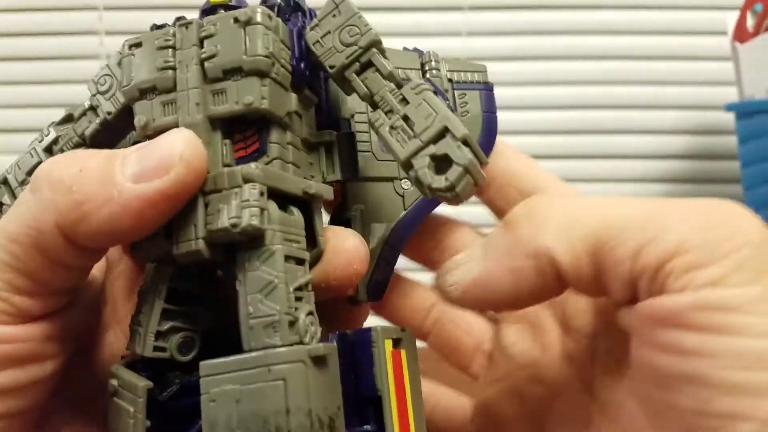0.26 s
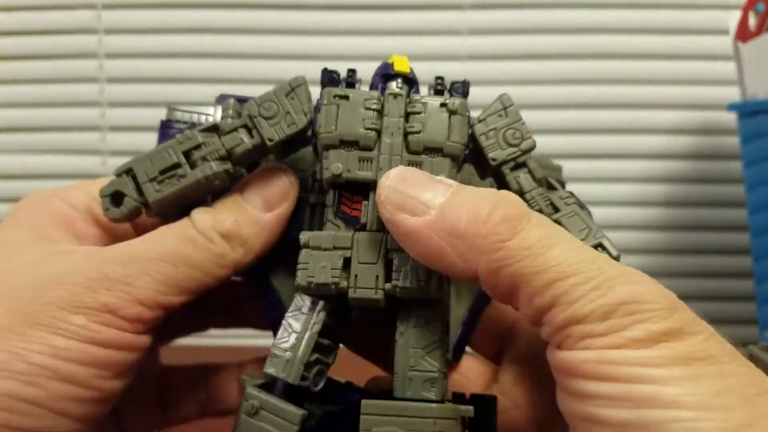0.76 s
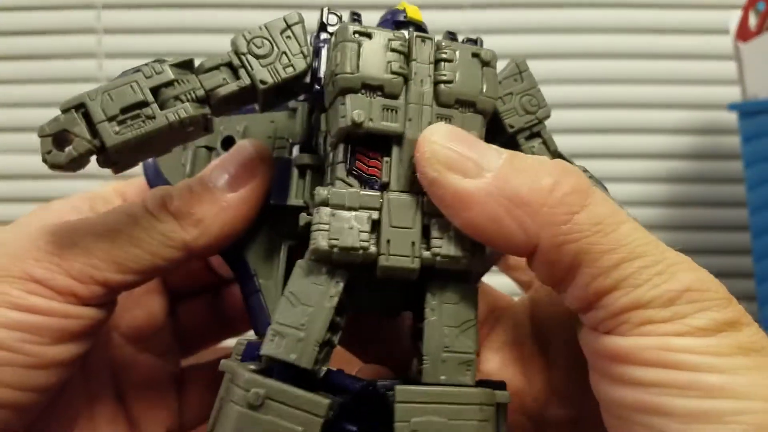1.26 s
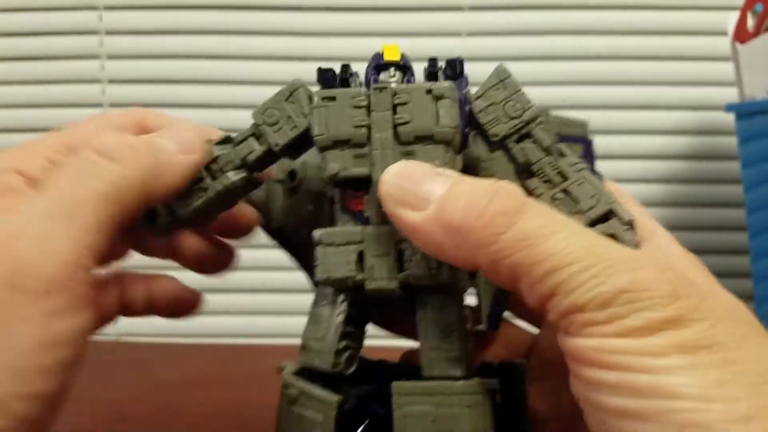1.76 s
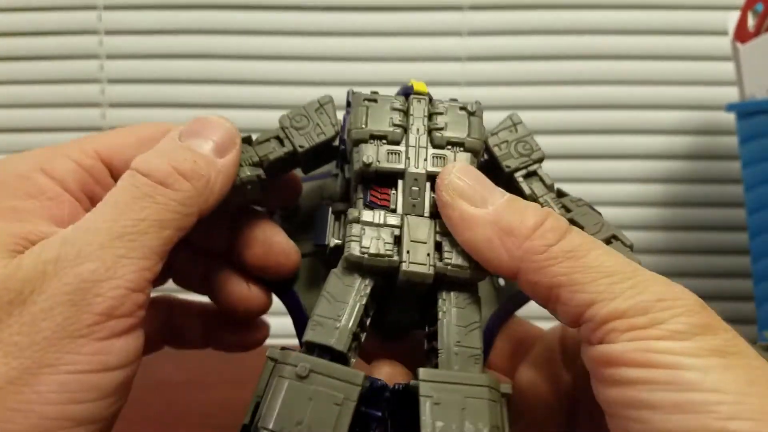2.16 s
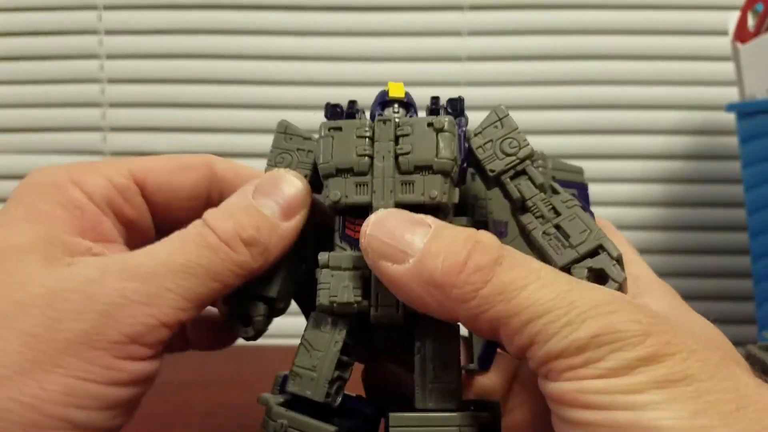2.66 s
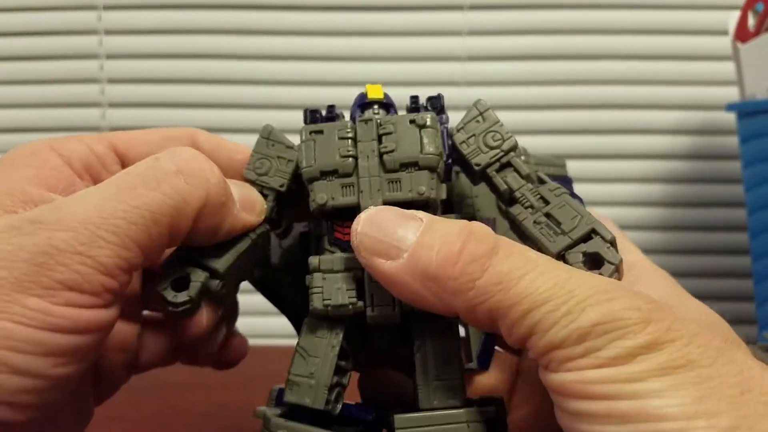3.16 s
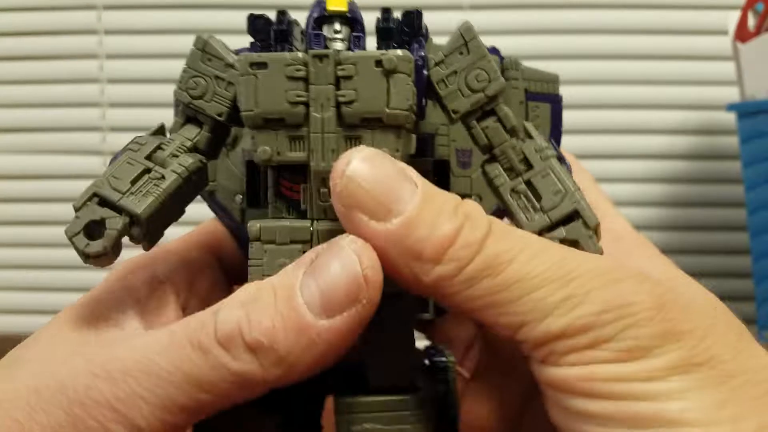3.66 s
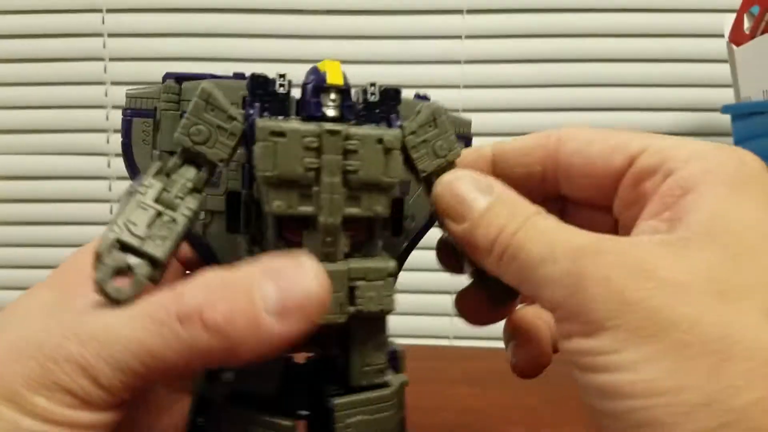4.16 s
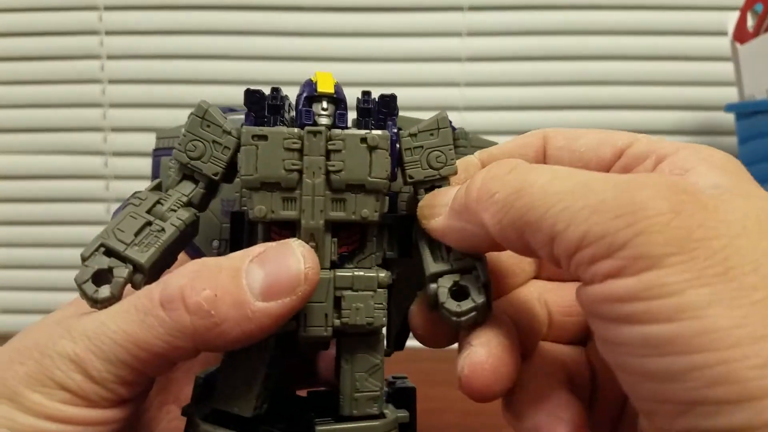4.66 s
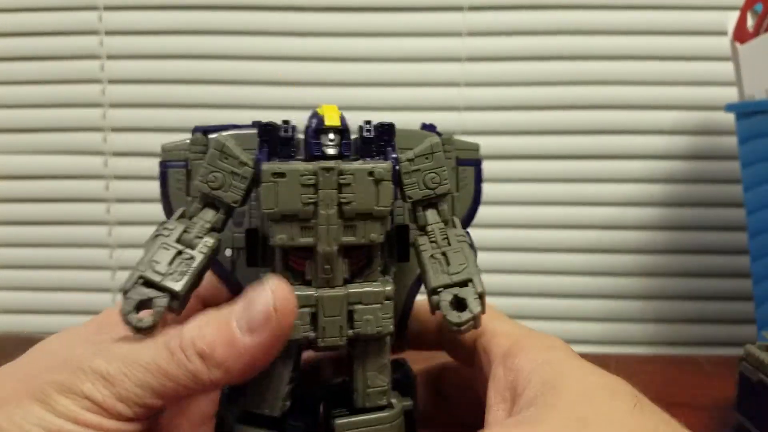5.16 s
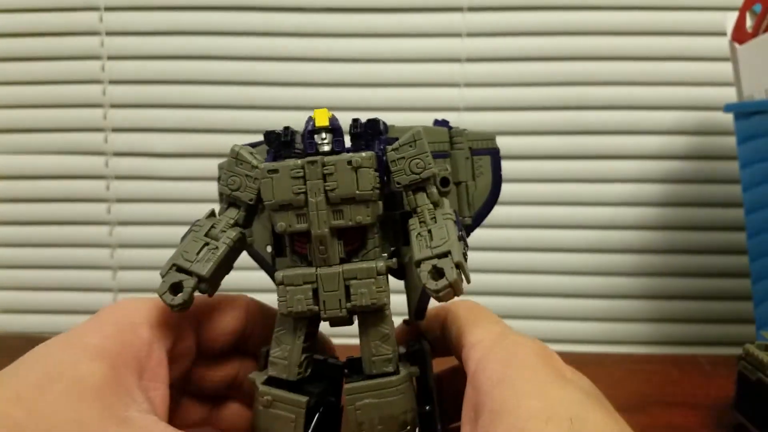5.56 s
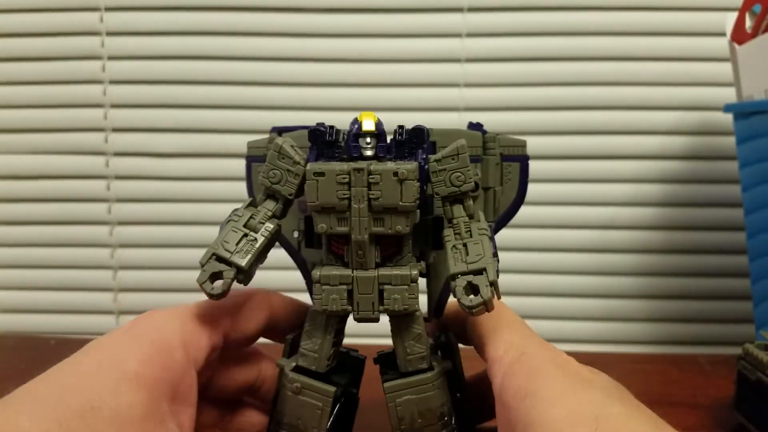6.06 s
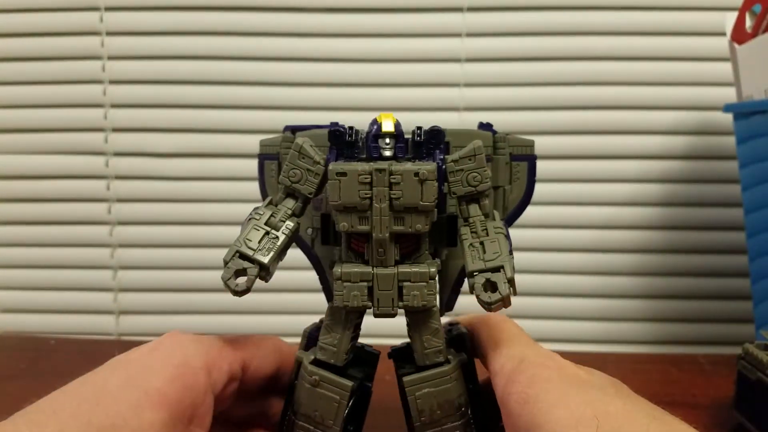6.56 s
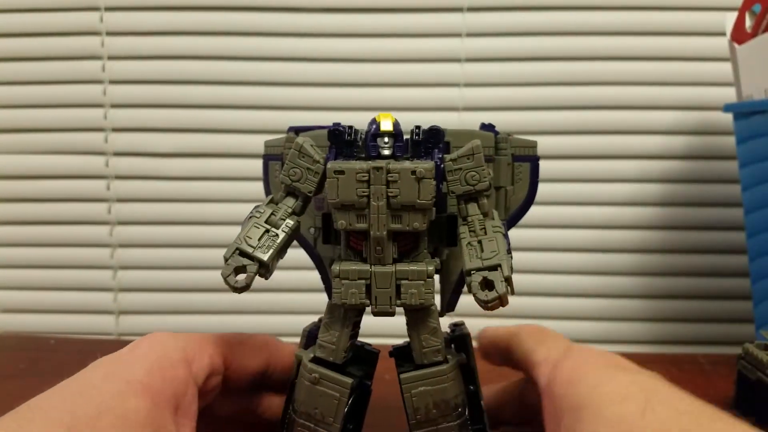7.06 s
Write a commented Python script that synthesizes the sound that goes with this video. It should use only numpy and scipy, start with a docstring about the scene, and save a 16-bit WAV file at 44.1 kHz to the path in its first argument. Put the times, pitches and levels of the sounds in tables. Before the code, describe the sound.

Light clicks and scrapes of a plastic figure being handled, followed by a louder knock and soft thumps on a desk.

```python
"""Plastic toy figure on a desk

Hands turn a hollow plastic figure, then stand it on a wooden desk in a quiet, humming room.
Impacts of joints and loose parts, and the friction of fingers, excite the resonances of its shell.
Its feet knock and drag on the desk top, which booms. Two microphone ports hear it from close by."""
import sys
import numpy as np
from scipy import signal
from scipy.fft import rfft, irfft
from scipy.io import wavfile
from scipy.ndimage import uniform_filter1d, map_coordinates

SR = 44100
rng = np.random.default_rng(int(sys.argv[2]) if len(sys.argv) > 2 else 0)


def transcribe(signal):
    """Save signal, clipped to [-1, 1], as a 16-bit WAV file at the path in sys.argv[1]."""
    frames = np.atleast_2d(signal).T
    limited = np.clip(frames, -1, 1)
    pcm = np.round(limited * 32767).astype(np.int16)
    wavfile.write(sys.argv[1], SR, pcm)


N = 321930


def undb(db):
    """Amplitude ratio of a level in decibels."""
    return 10 ** (np.asarray(db) / 20)


def unit(x):
    """Normalisation to rms 1."""
    return x / np.sqrt(np.mean(x ** 2))


def decay(t, t60_s):
    """Exponential damping: 60 dB down after t60_s."""
    return np.exp(-np.log(1000) * t / t60_s)


def pan(left_over_right_db):
    """A level difference between the ports, as left and right gains."""
    return undb([[left_over_right_db / 2], [-left_over_right_db / 2]])


def curve(table):
    """Linear interpolation of each column over time, one value a sample."""
    time_s, *columns = np.transpose(table)
    return [np.interp(np.arange(N) / SR, time_s, column) for column in columns]


def ring(x, modes):
    """Modal superposition: resonators of alternating sign, scaled so white noise keeps its rms."""
    bank = [(signal.iirpeak(hz, hz / width_hz, SR), (-1) ** k * undb(db))
            for k, (hz, width_hz, db) in enumerate(modes)]
    impulse = signal.unit_impulse(4096)
    response = sum(gain * signal.lfilter(*mode, impulse) for mode, gain in bank)
    return sum(gain * signal.lfilter(*mode, x) for mode, gain in bank) / np.linalg.norm(response)


def band(x, low_hz, high_hz):
    """Band-pass filtering."""
    return signal.sosfilt(signal.butter(2, [low_hz, high_hz], "bandpass", fs=SR, output="sos"), x)


def wander(rate_hz):
    """Random modulation of rms 1: straight ramps between random values."""
    hold = int(SR / rate_hz)
    steps = np.repeat(rng.standard_normal(N // hold + 1), hold)
    return unit(uniform_filter1d(steps, hold)[:N])


def add(out, start_s, sound):
    """Superposition of a short sound on a longer one."""
    i = max(int(start_s * SR), 0)
    out[..., i:i + sound.shape[-1]] += sound[..., :N - i]


def strokes(table, extra_db=0):
    """Incoherent sum of envelopes that rise and fall straight in dB, length_s wide at depth_db down."""
    depth_db, rise_share, step = 15, 0.46, 32
    peak_s, level_db, length_s = np.transpose(table)[:3, :, None]
    late_s = np.arange(0, N, step) / SR - peak_s
    fall = np.maximum(-late_s / rise_share, late_s / (1 - rise_share)) / length_s
    power = np.sum(undb(level_db + extra_db - depth_db * fall) ** 2, axis=0)
    return np.repeat(np.sqrt(power), step)[:N]


# Spectrum of the background noise: frequency_hz, relative_density_db
HUM_SPECTRUM = [(30, -25), (50, -10), (130, -7.5), (215, -41), (262, 3.5), (330, -17.5), (520, 0.5),
                (620, -3), (720, -9), (1100, -3), (3140, -14), (3830, -18), (6330, -24), (8770, -30.5),
                (13400, -24), (16000, -19.5)]
# Likeness of that noise at the two ports: frequency_hz, correlation
HUM_CORRELATION = [(60, 0.97), (300, 1), (640, -0.38), (1400, -0.44), (3000, -0.036), (16000, -0.0039)]
# Blurred tones in the hum: pitch_hz, width_hz, level_db
HUM_TONES = [(275.3, 9.5, -83), (399.8, 13, -74.5), (582.6, 5.9, -73.5), (829, 9, -78), (1124, 11, -79.5)]
def hum():
    """Stationary room and microphone noise, correlated in the bass and independent in the treble."""
    log_hz = np.log(np.maximum(np.arange(N // 2 + 1) * SR / N, 1))
    density_db, correlation = [np.interp(log_hz, np.log(hz), values)
                               for hz, values in map(np.transpose, (HUM_SPECTRUM, HUM_CORRELATION))]
    spectra = rfft(rng.standard_normal((2, N))) * undb(density_db)
    mid, side = spectra * np.sqrt([1 + correlation, 1 - correlation])
    out = unit(irfft([mid + side, mid - side], N)) * undb(-60 + 0.66 * wander(5.07))
    for pitch_hz, width_hz, level_db in HUM_TONES:
        noise = rng.standard_normal(N) + 0.65 * rng.standard_normal((2, N))
        out += undb(level_db) * ring(noise, [(pitch_hz, width_hz, 0)])
    return out


def room(x, level_db=-9):
    """Diffuse reverberation: convolution with a short, dull noise tail, different at each port."""
    t = np.arange(SR // 2) / SR
    tail = rng.standard_normal((2, len(t))) * decay(t, t60_s=0.12) * (t > .003)
    tail = signal.lfilter([1], [1, -.3], tail)
    tail /= np.linalg.norm(tail, axis=1, keepdims=True)
    return undb(level_db) * signal.fftconvolve(x, tail, axes=1)[:, :N]


# Arms and sleeves moving on the desk: time_s, rumble_db, shuffle_db
ARM_MOVES = [(0, -71.5, -69.5), (.59, -66, -59), (.9, -69, -65.5), (1.6, -68.5, -63.5), (2.1, -71, -64.5),
             (2.35, -86, -67.5), (3.2, -83, -68), (3.4, -75.5, -64.5), (3.96, -66, -61), (4.35, -71, -67.5),
             (4.9, -69.5, -61), (5.03, -71, -64), (5.12, -51.5, -59), (5.5, -71, -60), (5.9, -70.5, -64),
             (6.15, -60.5, -58.5), (6.75, -65, -59), (7, -70, -60.5), (7.3, -68, -69.5)]
# An arm leans on the desk: peak_s, level_db, length_s
ARM_LEANS = [(1.06, -61, 0.073), (1.87, -55, 0.19)]
def arms():
    """Structure-borne sound: the desk carries the arms' low rumble and dull shuffle."""
    rumble_db, shuffle_db = curve(ARM_MOVES)
    deep_db = np.minimum(rumble_db + 1.7, -70)  # follows the rumble up to a ceiling
    weight = undb(deep_db) + strokes(ARM_LEANS)
    noise = rng.standard_normal(N) + 0.64 * rng.standard_normal((2, N))
    deep = unit(band(noise, 41, 78)) * weight * undb(2 * wander(5.65))
    rumble = unit(band(noise, 101, 170)) * undb(rumble_db + 1.7 * wander(12))
    shuffle = unit(band(band(noise, 194, 608), 264, 1150)) * undb(shuffle_db)
    return (deep + rumble + shuffle) * pan(-2.4)


# The feet push on the desk top: start_s, level_db, pitch_hz
FOOT_THUMPS = [(5.073, -22.5, 134.5), (5.13, -34, 124), (5.258, -29, 131), (5.57, -37, 144),
               (5.966, -35, 141), (6.129, -35, 147), (6.414, -40, 119), (6.783, -36.5, 131),
               (6.835, -35.5, 158), (7.26, -41.5, 126)]
# The feet drag across it: peak_s, level_db, length_s
FOOT_DRAGS = [(5.2, -51, .15), (5.266, -47, .08), (5.39, -54, 0.24), (5.58, -58, 0.18), (5.87, -54, .16),
              (6.04, -54, 0.14), (6.142, -52, 0.14), (6.25, -54, 0.14), (6.32, -56, 0.24), (6.42, -63, 0.1),
              (6.61, -51, 0.26), (6.84, -63, 0.29)]
# Modes of the board: pitch_hz, width_hz, gain_db
DESK_MODES = [(133, 25, -1.5), (104, 26, -8)]
def desk():
    """Plate vibration: a damped free swing after each push, a forced drone while the feet drag."""
    booms, t = np.zeros(N), np.arange(SR // 4) / SR
    envelope = (1 - np.exp(-t / 0.0043)) * decay(t, t60_s=0.079)
    for start_s, level_db, pitch_hz in FOOT_THUMPS:
        add(booms, start_s, undb(level_db) * envelope * np.sin(2 * np.pi * pitch_hz * t))
    friction = rng.standard_normal(N) * strokes(FOOT_DRAGS)
    drone = 0.89 * band(ring(friction, DESK_MODES), 75, 180)
    return (booms + drone) * pan(-2.2)


def squeak(peak_s=4.885, length_s=0.19):
    """Frequency and amplitude modulation: a thin, unsteady sine arches in pitch and level."""
    sag = ((np.arange(N) / SR - peak_s) / (length_s / 2)) ** 2  # 0 in the middle, 1 at the ends
    pitch_hz = (10900 - 1100 * np.minimum(sag, 1)) * (1 + .005 * wander(250))
    level_db = -75 - 12 * np.minimum(sag, 1) + 3.2 * wander(130)
    tone = np.sqrt(2) * np.sin(2 * np.pi * np.cumsum(pitch_hz) / SR)
    return tone * undb(level_db) * (sag < 1)


# Direction of the busy hand, as the left port's delay behind the right: time_s, lag_ms
HAND_LAG = [(0, -0.08), (.9, 0.015), (1.2, -0.33), (2.9, -0.33), (3.1, 0.028), (4.4, 0.022), (4.8, -0.16),
            (5.05, 0.27), (5.9, 0.362), (6.2, -0.1), (6.6, 0.34), (7.0, 0.31), (7.2, -.25)]
def ports(x):
    """Arrival-time difference: sound from the moving hand reaches the two ports at different moments."""
    half_lag = curve(HAND_LAG)[0] * SR / 2000  # samples
    return np.array([map_coordinates(x, [np.arange(N) - side * half_lag], order=3) for side in (1, -1)])


# Modes of the plastic shell in five rising bands: pitch_hz, width_hz, gain_db
LOW_MODES = [(1570, 1170, -2), (2035, 160, 7), (2440, 420, -4.5)]
BODY_MODES = [(2890, 1040, -8), (3206, 140, 6.5), (3474, 160, -1), (3800, 130, -1)]
UPPER_MODES = [(4177, 390, 1.7), (4920, 640, 1.1)]
EDGE_MODES = [(5560, 420, 2), (6290, 450, 4), (6800, 720, 0.5), (7780, 490, -2.5)]
TOP_MODES = [(11830, 2000, -1), (12330, 850, 6), (13470, 2340, 2), (16200, 1100, -26)]
def shell(drives):
    """Resonance of the hollow shell: the response of each band to its own driving force."""
    bands = (LOW_MODES, BODY_MODES, UPPER_MODES, EDGE_MODES, TOP_MODES)
    return [ring(drive, modes) for drive, modes in zip(drives, bands)]


# A foot slides: peak_s, level_db, length_s
FOOT_SLIDE = [(5.645, -61, 0.09)]
def slide():
    """Forced resonance: smooth friction excites only the shell's main cavity mode."""
    friction = rng.standard_normal(N) * strokes(FOOT_SLIDE)
    return ports(band(ring(friction, BODY_MODES[1:2]), 3080, 3300))


# Strokes of fingers and joints: peak_s, level_db, length_s, relative_treble_db
RUBS = [(0.384, -58.5, 0.35, -5), (0.48, -60.5, .2, -9), (0.615, -50.5, 0.17, -6), (0.732, -50, 0.048, -16),
        (0.88, -66, .18, -12), (1.071, -52.5, 0.12, -18), (1.21, -59, 0.067, -7), (1.566, -68.5, 0.45, -11),
        (1.79, -59.5, 0.21, -7), (1.946, -53.5, 0.13, -9), (2.088, -60, 0.042, -13), (2.234, -63, 0.2, -6),
        (2.431, -63.5, 0.11, 1.5), (2.543, -58.5, 0.092, -5), (2.791, -61.5, 0.12, -5),
        (3.024, -56.5, 0.069, -12), (3.31, -64.5, 0.08, -14), (3.49, -62, 0.069, -4.5),
        (3.604, -53, 0.081, -4), (3.665, -52.5, 0.082, -8), (3.83, -55, 0.22, -5.5), (3.914, -54, 0.14, -7),
        (4.048, -51.5, 0.13, -8.5), (4.176, -64.5, 0.17, -4), (4.259, -58, 0.055, -5),
        (4.372, -61.5, 0.1, -8), (4.787, -59, 0.23, -6), (5.093, -42, 0.038, -12),
        (5.168, -51.5, 0.18, -10), (5.253, -51.5, 0.12, -6), (5.372, -51.5, 0.095, -9),
        (5.473, -60, 0.44, -8), (5.624, -65, 0.74, -8), (5.984, -51, 0.067, -5), (6.174, -62, 0.58, -5),
        (6.357, -61, 0.35, -10), (6.613, -52, 0.057, -8), (6.852, -66, 0.1, -4.5), (6.954, -49, 0.068, -15),
        (7.238, -66, 0.35, -1), (7.3, -48, 0.079, -8)]
def rub(rest_db=-89):
    """Sliding friction: skin and joints slip in dense, uneven grains that drive the shell."""
    force = strokes(RUBS) + undb(rest_db)  # hands never lie quite still
    treble_force = strokes(RUBS, extra_db=np.array(RUBS)[:, 3:]) + undb(rest_db - 6.5)
    grain_db = 1.8 * rng.exponential(size=N) + 2.2 * wander(90)
    grains = unit(rng.standard_normal(N) * undb(grain_db))
    low, body, upper, edge, top = shell([grains] * 5)
    rasp = undb(-4) * low + undb(-8) * body + undb(-9) * (upper + edge)
    return ports(rasp * force + top * treble_force)


# Modes of figure and desk together, in three rising bands: pitch_hz, width_hz, gain_db
DEEP_MODES = [(240, 49, -1.5), (306.7, 30, 4), (409, 61, -0.5)]
MIDDLE_MODES = [(661, 57, 0), (810, 72, 0.0048), (960, 70, 0)]
HARD_MODES = [(1228, 150, -2), (1442, 67, 0.5), (1700, 180, -4)]
# Dull knocks of the whole figure: start_s, middle_db, deep_over_middle_db, hard_over_middle_db
KNOCKS = [(.404, -49, 2.5, 3), (1.149, -43, -12, -11), (1.763, -50, -2, -4), (2.996, -43, -13, -5),
          (3.09, -47, -29, -35), (5.072, -47.5, 13.5, 5), (5.078, -37, 0, -19), (5.129, -33, -4.5, 7),
          (5.137, -28.5, -22, -21), (5.145, -38.5, -13, 9.5), (5.153, -35.5, 1.5, -11), (5.17, -34, -2, 0),
          (5.254, -55, -1, 18), (5.31, -45, 6, 3.5), (5.966, -56.5, 6, 5), (6.021, -52.5, -14, 8),
          (6.417, -41, 1.5, 3.5), (6.599, -47.5, 3, 9.5), (6.629, -52.5, 5, 10.5), (6.831, -44.5, 1, 1),
          (6.838, -34, -11, 4.5), (6.864, -44.5, 4, 0), (6.948, -40.5, 1, 6.5), (7.255, -58.5, 7, 11),
          (7.282, -51.5, -9, 11)]
def knocks():
    """Impact excitation: a blow and its rough after-contacts ring the modes of figure and desk."""
    drives, t = np.zeros((3, N)), np.arange(SR // 8) / SR
    for start_s, middle_db, deep_db, hard_db in KNOCKS:
        force = rng.standard_normal(len(t)) * decay(t, t60_s=0.027)
        force[:8] -= 3.5  # the blow itself
        add(drives, start_s, 0.33 * force * undb(middle_db) * undb([[deep_db], [0], [hard_db]]))
    body = sum(ring(drive, modes) for drive, modes in zip(drives, (DEEP_MODES, MIDDLE_MODES, HARD_MODES)))
    return ports(body) * pan(-2.8)


def faint_ticks(rate_per_s=16):
    """A random point process: rows like those of TICKS, their level following the rubbing."""
    count = int(rate_per_s * N / SR)
    when, rise, ringing, side = rng.random((count, 4)).T
    body_db = 20 * np.log10(strokes(RUBS)[(when * N).astype(int)] + 1e-9) + 3.5
    colour_db = np.tile([-7, -4.5, -9], (count, 1))  # low, upper, treble
    rise_ms, t60_s, pan_db = 6 * rise, 0.05 * ringing, 15 * (2 * side - 1)
    return np.column_stack([when * N / SR, body_db, colour_db, rise_ms, t60_s, pan_db])


# Balance of the ticks in each of the shell's five bands: left_over_right_db
BAND_PAN_DB = [-1.5, 0.92, 0.36, -2.3, -0.12]
# Joints and loose parts tick: start_s, body_db, low_over_body_db, upper_over_body_db,
# treble_over_body_db, rise_ms, t60_s, left_over_right_db
TICKS = [(.229, -55, -11, -12, -21, 3.2, 0.015, 3), (.3136, -46.5, 0.5, 8.5, -2, .58, 0.024, 5.5),
         (.3677, -38.5, -15, -11, -13, 4.6, 0.027, 1), (.428, -52, -3, -8, -10, 0.73, .022, -4),
         (.5447, -46, -6, -9, -15, .6, 0.044, 2), (.5603, -41.5, -5.5, -3, -4.5, 0.7, 0.015, 0),
         (.5786, -43, -3, 1, -3, .4, .02, -1), (.5855, -42.5, -4, -2, 0, 1.4, 0.018, -4),
         (.5982, -30.5, -9, -1.5, -2, 0.18, 0.034, -2), (.6226, -38.5, -11, -2, -2.5, 0.73, 0.015, -2),
         (.643, -42, -13, -4, -7.5, 4.6, .057, 0), (.6992, -33.5, -10, -8, -8, 4.3, .015, 2),
         (.7236, -53, 1, 0, 5, .7, .021, -7), (.7389, -40.5, -8, -8, -17, 7.8, 0.017, 9.5),
         (.7506, -44, -7, -18, -21, 1.1, 0.043, -7), (.985, -61, -6, -3, 2, .6, .015, 0),
         (1.0437, -47.5, -4, -1.5, -7, .3, 0.078, -1), (1.0624, -37, -9, -5, -4.5, 0.28, 0.038, 5.5),
         (1.0745, -48, -2, -12, -19, 9, .014, -2), (1.2169, -49.5, -5.5, -6, -10.5, .6, 0.08, -2),
         (1.488, -59.5, -8, 7, -6, 3.4, 0.027, -2), (1.5664, -52.5, -1, -3, -7, 4.1, .028, 1),
         (1.763, -46.5, -1, -8, -5, 1.2, 0.021, -1), (1.8327, -55, -3, 0, -6, .45, .016, -1),
         (1.9018, -52.5, 3, 1, -12, 1.2, .032, 1), (1.924, -40.5, -2.5, -2, -0.5, 0.66, 0.033, -2),
         (1.9369, -40.5, -10, 0, -12, .44, .024, 3), (1.951, -46, -16, -8, -24, 9.4, .057, 4),
         (1.9864, -49, -10, 1, -9, 2.4, .016, -5), (2.029, -40, -13, -1.5, -6.5, 0.28, 0.0099, -1.5),
         (2.0839, -47, -4, -3.5, -11, 2.3, .023, -4), (2.1932, -44.5, -7, 0, -10.5, .7, 0.019, -4),
         (2.5968, -54.5, -13, -10, -8.5, 6.3, 0.091, -1),
         (2.9958, -28.5, -4.5, 0.5, -0.5, 0.32, .0096, -6.5), (3.0009, -41, -18, -13, -5, 1.3, 0.012, 13),
         (3.469, -48.5, -3, -9, 0, 0.51, .016, -2), (3.4779, -54, -3, -1, 7.5, 11, .033, 4.5),
         (3.523, -50, -14, -3, -17, 1.4, .021, 0), (3.6519, -42, -6, 1, -1.5, .37, 0.013, -2),
         (3.6907, -60, -6, -8, 0, 2.2, .019, -7), (3.8194, -44, -10, 0, -2, .3, .023, -1),
         (3.8352, -45, -9, 2, 2, 3.6, 0.032, -4), (3.8795, -47.5, -9, -6, -15, 7.7, 0.058, -5),
         (3.9, -48, -12, -1, -10, 5.6, 0.08, 0), (4.0323, -45, -3, -5, -5, 2.3, .02, 3),
         (4.171, -42, -2, -5, -8, 1.4, 0.026, 1.5), (4.2143, -46, -15, -12, -11, 1.3, .016, -1),
         (4.345, -49, -12, -11, -9, 1.9, 0.026, -3), (5.0714, -25, -3.5, -5.5, -5, 2.8, 0.022, -5),
         (5.0795, -21.5, -2.5, -3.5, 3, .37, 0.016, 3.5), (5.1275, -42.5, 5, -9, -7, 8.4, 0.032, -2),
         (5.1595, -43.5, 2, -2, -1.5, .45, 0.081, 0), (5.1903, -39.5, -5, 2, 0, 2.2, 0.031, -0.5),
         (5.2536, -47, -5, -12, -10, 4.4, .07, 1), (5.3087, -48, 9, -.4, -11, .2, 0.0064, 11),
         (5.3128, -41, -14, -4.5, -3, 2.4, .012, 2), (5.3854, -31.5, -8.5, -10, -6.5, 1.4, 0.028, 2),
         (5.4437, -48, -4, -7, -8, .8, 0.038, 1), (5.4952, -50, 8, -3, -9, .3, 0.021, -3),
         (5.509, -36, -7.5, -12, -4, 0.42, .013, 4.5), (5.5266, -50.5, -4, -2, -5, 0.75, .013, -12),
         (5.9642, -44, -12, -5, -12, 0.99, .012, 0), (5.9853, -51, -2, -10, -8, 6.4, .11, -1),
         (6.225, -55, -3, -3, -4, .6, .015, 0), (6.3, -60, 0, -4, -8, .6, .015, 0),
         (6.4154, -41.5, 5, -10, -16, 0.37, 0.0072, -2), (6.5421, -45, 0, -6, -4, 0.51, 0.013, 0),
         (6.6, -46, 2.5, -1, -7, 0.24, 0.035, -1), (6.7828, -55.5, 11.5, -7, -2, .45, 0.013, 1),
         (6.8319, -45.5, 2, -11, -2, .45, 0.014, -4.5), (6.8504, -55.5, 7, -7, -3, .9, 0.026, 9),
         (6.9485, -33, -2, -2.5, 1, 0.89, 0.0056, -6), (6.97, -51, 5, -4, -5, 1.5, 0.021, 8),
         (7.2523, -48.5, 2, -15, -17, 2.6, 0.041, 4), (7.2827, -27.5, -13, -6.5, -10, 1.6, 0.018, -2),
         (7.296, -34.5, -4.5, -5, -3, 2, .03, 7)]
def ticks(colour_scatter_db=1.76, lag_scatter_ms=0.15):
    """Contact chatter: each tick is a burst of tiny impacts that swells, dies and rings the shell."""
    drives, t = np.zeros((5, 2, N)), np.arange(SR // 8) / SR
    rows = np.vstack([TICKS, faint_ticks()])
    for start_s, body_db, low_db, upper_db, treble_db, rise_ms, t60_s, pan_db in rows:
        rise_s = max(rise_ms, .1) / 1000
        envelope = np.where(t < rise_s, t / rise_s, decay(t - rise_s, max(t60_s, .004)))
        chatter = envelope * rng.standard_normal(len(t)) * undb(2.03 * rng.exponential(size=len(t)))
        chatter *= np.linalg.norm(envelope) / np.linalg.norm(chatter)  # contacts share a set energy
        colour_db = [low_db, 0, upper_db, treble_db, treble_db + 0.5]
        band_db = body_db + colour_scatter_db * rng.standard_normal(5) + colour_db
        force = chatter * undb(band_db)[:, None]
        lag_ms = np.interp(start_s, *np.transpose(HAND_LAG)) + lag_scatter_ms * rng.standard_normal()
        for port, side in enumerate((1, -1)):
            add(drives[:, port], start_s + side * lag_ms / 2000, force * undb(side * pan_db / 2))
    return sum(sound * pan(pan_db) for sound, pan_db in zip(shell(drives), BAND_PAN_DB))


def scene():
    """Superposition of the figure, its reverberation, the desk and the background."""
    figure = ticks() + rub() + slide() + knocks()
    return figure + room(figure) + squeak() + desk() + arms() + hum()


def record(dry):
    """Band limiting: the microphone thins the deepest bass and cuts the highest treble."""
    thinned = signal.sosfilt(signal.butter(2, 38, "highpass", fs=SR, output="sos"), dry)
    return signal.sosfilt(signal.ellip(8, .2, 60, 15750, fs=SR, output="sos"), thinned)


dry = scene()
out = record(dry)
transcribe(out)
```